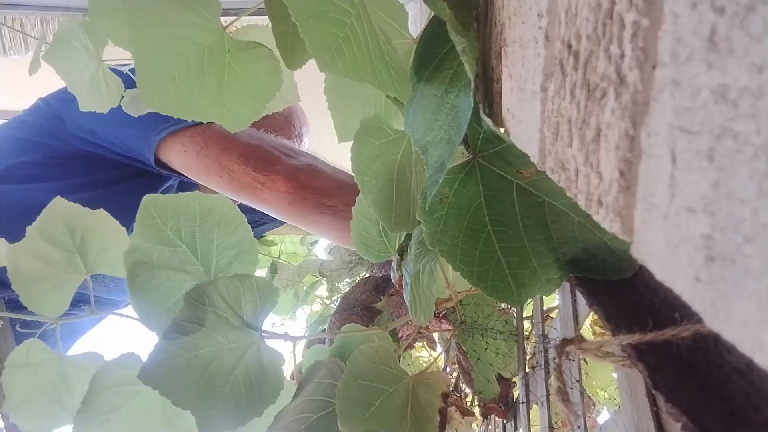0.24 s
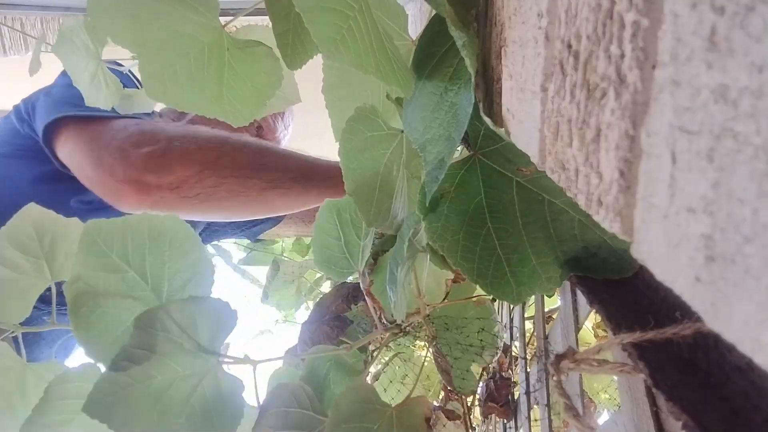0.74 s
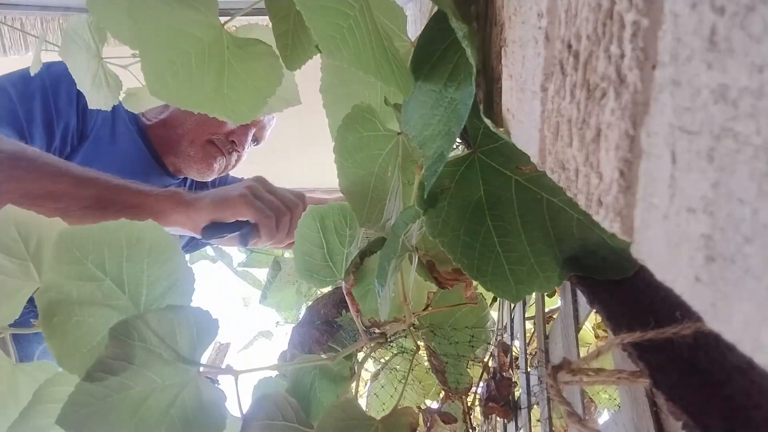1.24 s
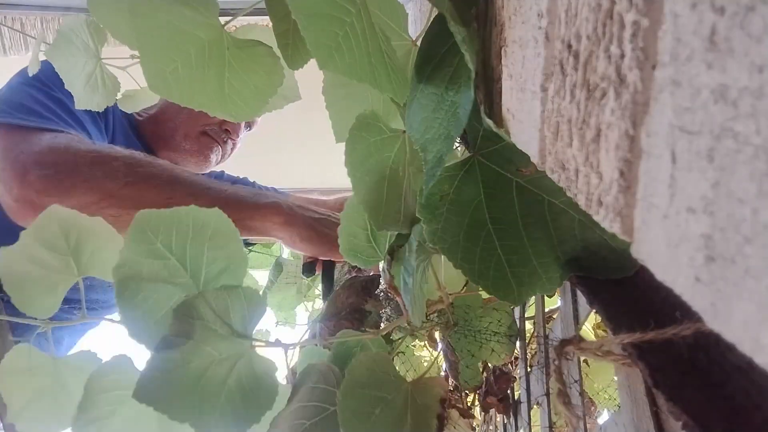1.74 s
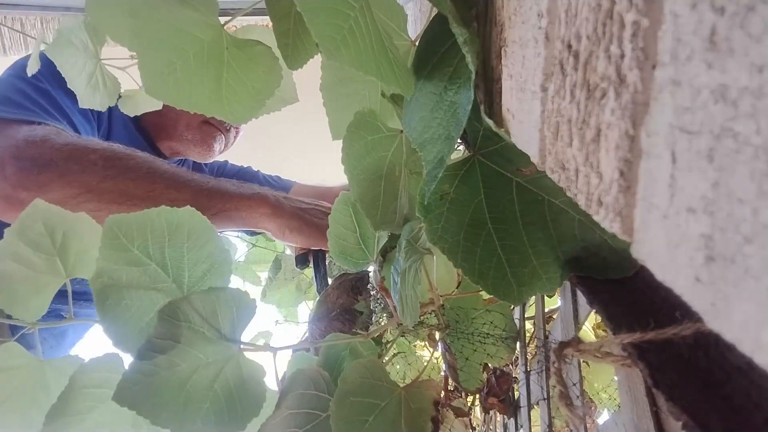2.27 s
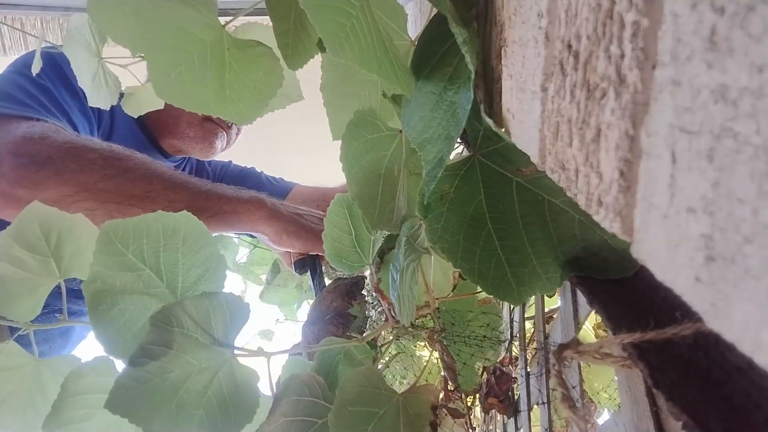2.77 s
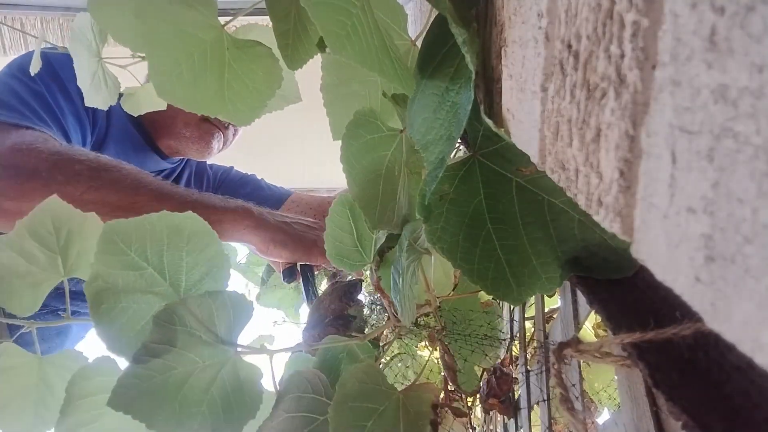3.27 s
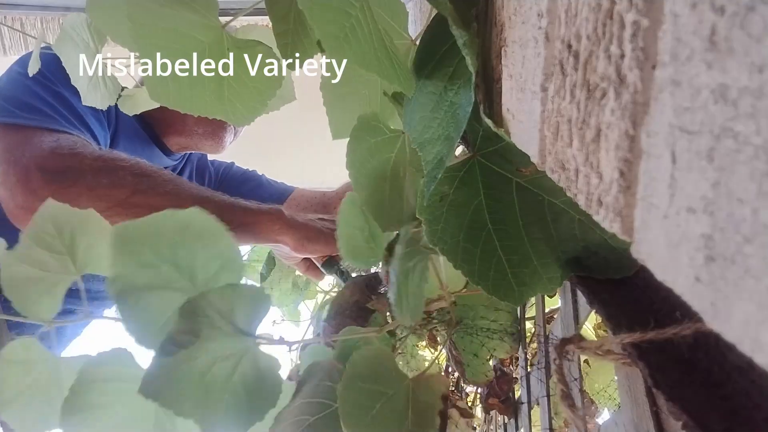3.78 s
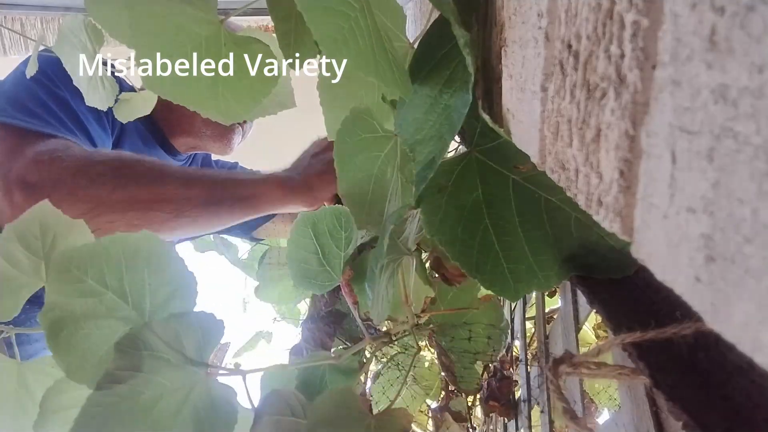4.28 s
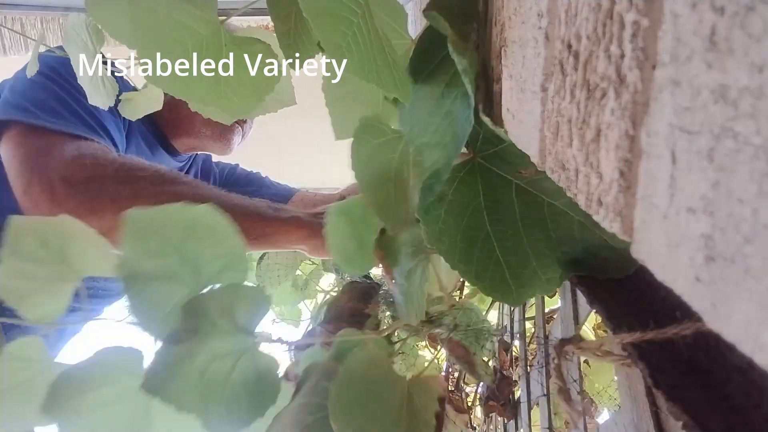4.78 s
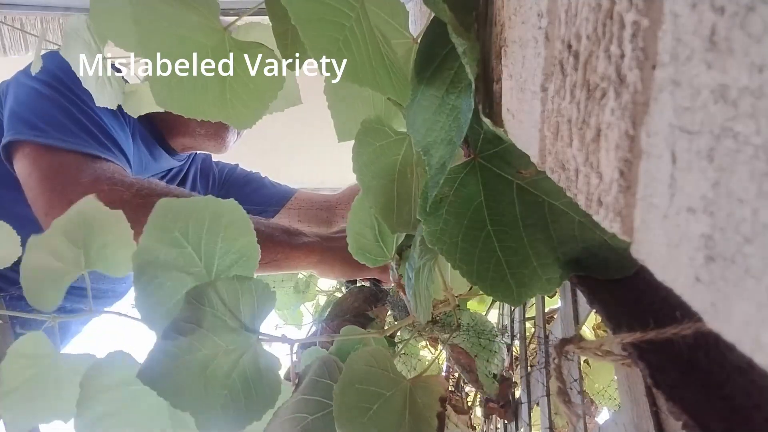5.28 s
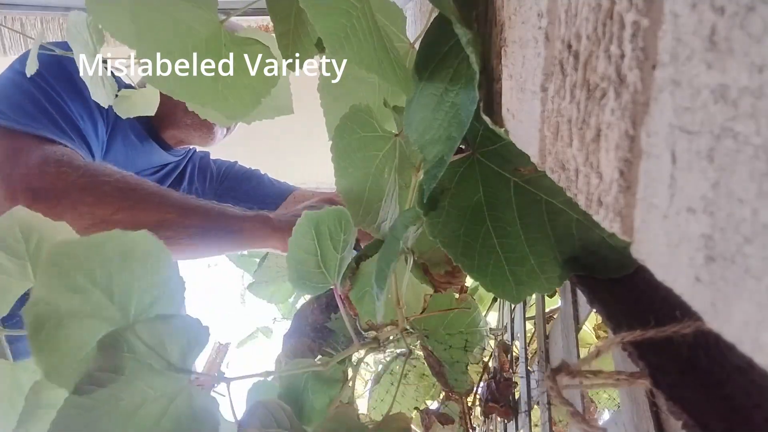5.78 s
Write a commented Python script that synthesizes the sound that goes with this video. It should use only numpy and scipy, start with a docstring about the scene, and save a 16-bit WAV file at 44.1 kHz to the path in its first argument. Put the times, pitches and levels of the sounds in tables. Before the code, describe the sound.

One close, crisp cut of hand shears outdoors, followed by light leaf rustling that builds with small cracks and ticks.

```python
"""Pruning shears snip once through a grape stalk, close by, under a vine trained along a house wall:
the fibres fracture in steps and two impacts excite the modes of the metal. Then hands work into the
foliage: leaves slide and buckle, shoots knock, and smaller stalks snap. The leaves and the wall
scatter these sounds briefly; a distant machine hums under the quiet outdoor air."""
import sys
import numpy as np
from scipy import signal
from scipy.fft import rfft, irfft, next_fast_len
from scipy.io import wavfile

SR = 44100
rng = np.random.default_rng(int(sys.argv[2]) if len(sys.argv) > 2 else 0)


def to_wav(s):
    """Save 16-bit WAV."""
    ch = np.atleast_2d(s).T  # columns
    pcm = np.round(np.clip(ch, -1, 1) * 32767)  # PCM
    wavfile.write(sys.argv[1], SR, pcm.astype(np.int16))


N = 265570
T = np.arange(N) / SR
SIZE = next_fast_len(N, True)
FREQS = np.fft.rfftfreq(SIZE, 1 / SR)
TOP_HZ = 14500


def amp(db):
    """Amplitude grows tenfold for every 20 dB."""
    return 10 ** (np.asarray(db) / 20)


def unit(x):
    """Normalisation to an rms of 1."""
    return x / np.sqrt(np.mean(x ** 2))


def shape(points):
    """Interpolation of (Hz, value) rows over log frequency, at every spectral bin."""
    hz, value = np.transpose(points)
    return np.interp(np.log(FREQS + 1), np.log(hz), value)


def filtered(x, gain):
    """Linear filtering multiplies each spectral bin by a gain."""
    return irfft(rfft(x, SIZE) * gain, SIZE)[..., :N]


def colour(x, points):
    """Minimum-phase filtering: folding the cepstrum makes a (Hz, dB) spectrum causal, at unit power."""
    cepstrum = irfft(np.log(unit(amp(shape(points)))), SIZE)
    cepstrum[1:SIZE // 2] *= 2
    cepstrum[SIZE // 2 + 1:] = 0
    return filtered(x, np.exp(rfft(cepstrum)))


def walk(rate):
    """Slow random modulation of rms 1, joining `rate` Gaussian values a second."""
    knots = rng.standard_normal(int(N / SR * rate) + 2)
    return unit(np.interp(T * rate, np.arange(len(knots)), knots))


def burst(start, rise, t60):
    """Exponential decay, 60 dB in t60 seconds, after a quick build-up."""
    first = max(int(start * SR), 0)
    t = T[:min(int(2 * t60 * SR) + 2, N - first)]
    envelope = np.zeros(N)
    envelope[first:first + len(t)] = amp(-60 * t / t60) * (1 - amp(-60 * t / rise))
    return envelope


def grains(rate, scatter_db):
    """Shot noise: about `rate` tiny clicks a second, of uneven size, shared by two noise carriers."""
    size = (rng.random(N) < rate / SR) * amp(scatter_db * np.clip(rng.standard_normal(N), -2, 2))
    smear = np.exp(-np.arange(24) / 8)
    power = signal.lfilter(smear, 1, size ** 2)
    return unit(np.sqrt(power) * rng.standard_normal((2, N)))


def placed(pan_db):
    """A level difference sets direction; pan is the left level minus the right."""
    return amp(np.array([[.5], [-.5]]) * pan_db)


def spread(pair):
    """Partial coherence: long waves reach both sides alike, short waves unrelated."""
    # Likeness of the sides. Each row: frequency in Hz, coherence from 0 to 1.
    likeness = [(30, 0.6), (70, 1), (250, 0.88), (640, 0.93), (1400, 0.2), (15000, 0)]
    alike = shape(likeness)
    mid, side = filtered(pair, np.sqrt([(1 + alike) / 2, (1 - alike) / 2]))
    return np.array([mid + side, mid - side])


def outdoors(waver_db, drift_rad):
    """A line spectrum over broadband noise: a distant machine's hum wavers on its way through the air."""
    # Distant rumble falling to a thin hiss. Each row: frequency in Hz, relative level in dB.
    air_spectrum = [(25, -31), (50, -13), (75, -1), (115, 0), (150, -7), (210, -13), (380, -12), (700, -19),
                    (1000, -24), (1600, -29), (2400, -29), (3200, -35), (6000, -40), (14500, -37)]
    # The machine's tones. Each row: frequency in Hz, rms level in dB about which it wavers.
    hum_lines = [(119.5, -62.5), (228, -73), (279.4, -72.5), (361, -74), (480, -74.5), (559, -76.5),
                 (715, -81), (1005, -85), (1301, -84)]
    air = unit(filtered(spread(rng.standard_normal((2, N))), amp(shape(air_spectrum))))
    hum = 0
    for hz, db in hum_lines:
        amplitude = np.sqrt(2) * amp(db + waver_db * walk(7))
        hum += amplitude * np.sin(2 * np.pi * hz * T + drift_rad * walk(12))
    return amp(-54.8 + walk(4.15)) * air + hum


def leaf_motion():
    """Incoherent sources add in power: hand strokes sum to the gains of the leaves' body and treble."""
    # A hand brushes the leaves. Each row: fastest moment in seconds, level in dB, length in seconds,
    # extra treble in dB.
    strokes = [(0.00, -66.5, 0.16, 11), (0.42, -60, 0.13, 2.5), (0.8, -64, 0.21, 1), (0.945, -65, 0.1, 3),
               (1.27, -68, 0.5, 6), (1.796, -53.5, .22, 4), (1.95, -61, 0.2, 3), (2.06, -65, .2, 7),
               (2.813, -54.5, 0.041, -8), (2.833, -63, 0.23, 6), (3.072, -72, 0.14, 14.5),
               (3.265, -70, 0.28, 10.5), (3.504, -62, 0.27, 10), (3.656, -55, 0.22, 8),
               (3.84, -59, 0.1, 13.5), (3.895, -55.5, 0.37, 1.5), (4.163, -52, 0.49, 8.5),
               (4.322, -54, 0.074, 3), (4.442, -50, 0.18, 8.5), (4.778, -55, 0.047, 4.5),
               (4.892, -48, 0.22, 6), (4.97, -49.5, 0.3, 3.5), (5.26, -61, 0.46, 5),
               (5.485, -46, 0.19, 2.5), (5.727, -56, 1, 3), (5.96, -77, 0.25, 5)]
    range_db, swell_share = 12.5, 0.4  # the hand speeds up faster than it slows
    body = treble = amp(-81) ** 2  # leaves barely stirring
    for peak, db, length, treble_db in strokes:
        from_peak = np.maximum((peak - T) / swell_share, (T - peak) / (1 - swell_share)) / length
        power = amp(db - range_db * np.minimum(from_peak, 10)) ** 2
        body = body + power
        treble = treble + power * amp(treble_db) ** 2
    return np.sqrt(body), np.sqrt(treble)


def crinkles(rate, t60, scatter_db):
    """Buckling: single leaves give way at random moments, each in a very short crackle."""
    buckles = (rng.random(N) < rate / SR) * amp(-scatter_db * rng.random(N))
    envelope = signal.oaconvolve(buckles, burst(0, .004, t60)[:SR // 16])[:N]
    return unit(envelope * rng.standard_normal((2, N)))


def flicker(pair, depth_db, rate):
    """Independent amplitude modulation of overlapping bands, as new patches of leaf take over."""
    centres = np.linspace(0, 1, 7) ** 2 * TOP_HZ
    bands = (np.interp(FREQS, centres, row) for row in np.eye(len(centres)))
    return sum(filtered(pair, band) * amp(depth_db * walk(rate)) for band in bands)


def rustle():
    """Friction noise: leaves slide in fine grains, dry edges crinkle, and bent shoots brush more dully."""
    # Spectra of sliding leaves and of brushing shoots. Each row: frequency in Hz, relative level in dB.
    leaf_spectrum = [(300, 1), (1000, 7.5), (2200, 7.5), (4000, -2), (6500, -8), (9000, -4.5), (11300, -2),
                     (13300, -2), (14500, -21)]
    shoot_spectrum = [(60, -15), (140, 5), (230, -5), (350, 6.5), (520, -0.5), (900, 1), (1900, -7.5),
                      (3000, -8.5), (6000, -16), (14000, -59.5)]
    # The arm leans in and bends whole shoots. Each row: time in seconds, relative level in dB.
    lean = [(3.25, -83), (3.38, -65.5), (4.3, -58), (5.1, -63), (5.6, -60.5), (6.02, -55.5)]
    dry_hz, typical_stroke_db, shoot_follow = 4800, -58, 0.12
    body, treble = leaf_motion()
    friction = amp(walk(60)) * grains(rate=9900, scatter_db=-3.0)
    crackle = amp(-2.5) * crinkles(rate=90, t60=.018, scatter_db=14)
    dryness = FREQS ** 4 / (FREQS ** 4 + dry_hz ** 4)
    sliding = body * filtered(friction, 1 - dryness) + treble * filtered(friction + crackle, dryness)
    lean_s, lean_db = np.transpose(lean)
    bending = amp(np.interp(T, lean_s, lean_db)) * (body / amp(typical_stroke_db)) ** shoot_follow
    pushing = bending * amp(1.2 * walk(45)) * grains(rate=2500, scatter_db=0.0)
    brushing = amp(0.5) * colour(sliding, leaf_spectrum) + amp(0.4) * colour(pushing, shoot_spectrum)
    return flicker(spread(brushing), depth_db=1.7, rate=30)


def flicks():
    """Elastic release: a dry leaf edge or tendril springs free with a tiny crisp tick."""
    # Each row: start in seconds, level in dB, t60 in seconds, pan in dB.
    releases = [(0.195, -53, .05, -1), (0.465, -52, .06, 4), (0.530, -56.5, 0.045, 2),
                (0.753, -56, 0.12, 4), (0.920, -54, 0.13, 5), (1.293, -46, 0.026, -5),
                (1.399, -48, 0.037, -5), (1.450, -58, 0.035, -1), (1.475, -49, 0.031, 0),
                (1.698, -50.5, 0.033, 2), (1.866, -44.5, 0.046, -1), (2.148, -63, 0.045, 2),
                (2.447, -51.5, 0.041, 3), (2.538, -52, 0.042, -1), (3.073, -51.5, 0.068, 0),
                (3.103, -53, .05, -4), (3.4427, -45.5, .06, 0), (3.456, -43, 0.055, 1),
                (3.62, -50, 0.12, -3), (3.881, -38.5, 0.067, 4), (4.1215, -44, 0.066, -4),
                (4.683, -54, .05, -10), (4.833, -47, 0.13, 1), (5.072, -44, 0.057, -1),
                (5.143, -54, 0.042, 0), (5.4045, -47.5, .06, 1), (5.837, -47, 0.06, -4),
                (5.915, -56, 0.058, 0)]
    # Spectrum of a flick. Each row: frequency in Hz, relative level in dB.
    crisp_spectrum = [(500, -14), (2000, -9.5), (5000, -9), (8000, -6), (11500, 0.5), (14500, -0.5)]
    envelope = sum(amp(db) * placed(pan) * burst(s, .004, t60) for s, db, t60, pan in releases)
    return colour(envelope * spread(grains(rate=9800, scatter_db=10)), crisp_spectrum)


def snip():
    """Fracture and impact: fibres break in quick steps, and two blows excite the shears' damped modes."""
    # Modes of the shears. Each row: frequency in Hz, relative level in dB, t60 in seconds, pan in dB.
    modes = [(575, -19.5, 0.068, -8), (940, -20, 0.028, -17), (1040, -12.5, 0.073, -5),
             (1214, -5.5, 0.02, 8.5), (1345, -13, 0.044, 14), (1585, -13.5, 0.042, -8),
             (1667, -22, 0.055, 20), (2005, -21.5, 0.093, -12), (2250, -18, 0.045, -8),
             (2490, -21, 0.05, 14), (2690, -14, 0.051, 4), (3250, -20.5, 0.015, -27), (3440, -27, 0.035, 5),
             (3760, -37, 0.013, -3), (4100, -22, 0.023, -21), (10400, -14, 0.026, -10),
             (11640, -16, 0.043, -2), (13300, -27, 0.042, -4)]
    # The blade jumps through, then the jaws meet. Each row: time in seconds, level in dB.
    impacts = [(0.2840, -13.7), (0.28645, -17.3)]
    # Bite, crunch, break, tearing free. Each row: start in seconds, level in dB, rise and t60 in seconds.
    steps = [(0.2660, -36.5, 0.038, 0.15), (0.2786, -26.5, 0.0083, 0.1), (0.283, -18, 0.0022, 0.05),
             (0.306, -45, 0.0088, 0.061)]
    # Spectrum of breaking fibres. Each row: frequency in Hz, relative level in dB.
    fibre_spectrum = [(30, -62), (200, 1.5), (420, -4.5), (700, 1.5), (1200, 6.5), (2500, 3), (4200, 0),
                      (6500, -8.5), (9000, -2.5), (11500, 0.5), (14500, -3)]
    # Shading of a close cut off to one side. Each row: frequency in Hz, pan in dB.
    shading = [(600, 1.5), (1200, -8), (2500, 0), (4500, -4), (7000, -7), (9500, -1), (14500, -1)]
    t, ring = T[:SR // 4], 0
    for hz, db, t60, pan in modes:
        mode = amp(db) * placed(pan) * np.sin(2 * np.pi * hz * t) * amp(-60 * t / t60)
        ring = mode - ring  # neighbouring modes swing in opposite senses
    blows = sum(amp(db) * signal.unit_impulse(N, int(s * SR)) for s, db in impacts)
    metal = signal.fftconvolve(blows[None], ring, axes=1)[:, :N]
    breaking = sum(amp(db) * burst(s, rise, t60) for s, db, rise, t60 in steps)
    crack = colour(spread(breaking * grains(rate=10000, scatter_db=-1.5)), fibre_spectrum)
    return metal + filtered(crack, placed(shape(shading)))


def thuds():
    """Damped free vibration: the vine sounds a low tone as it is let go or tugged."""
    # Each row: start in seconds, level in dB, frequency in Hz, t60 in seconds.
    jolts = [(0.284, -40.5, 98, 0.37), (0.310, -38.5, 356, 0.065), (2.770, -39, 69, 0.13),
             (4.222, -33, 215, 0.029), (5.452, -53, 360, 0.047)]
    return sum(amp(db) * burst(s, 0.014, t60) * np.sin(2 * np.pi * hz * (T - s))
               for s, db, hz, t60 in jolts)


def taps():
    """Resonance: the shears' handles and spring tick, and each click drives a short, hollow ring."""
    # Each row: start in seconds, level in dB, resonance in Hz, t60 in seconds, pan in dB.
    contacts = [(2.330, -62, 2240, .055, 2), (2.538, -64, 1810, .055, 5), (3.034, -59, 1900, .07, 0),
                (3.373, -60, 1700, .06, 0)]
    bandwidth_hz, bare_click_db = 420, -10
    tapping = 0
    for s, db, hz, t60, pan in contacts:
        click = burst(s, .004, t60) * rng.standard_normal((2, N))
        detuning = FREQS / hz - hz / (FREQS + 1)
        hollow = unit(1 / (1 + 1j * detuning * hz / bandwidth_hz))
        tapping += amp(db) * placed(pan) * filtered(click, hollow + amp(bare_click_db))
    return tapping


def stalk(start, hz):
    """The inharmonic bending modes of one stalk ring as it snaps."""
    # Each row: frequency as a multiple of the stalk's pitch, relative level in dB.
    modes = [(0.92, 0.5), (1.138, -2.5), (1.7, -12), (2.35, -12)]
    first = int(start * SR)
    t = T[:min(SR // 8, N - first)]
    ring = sum(amp(db) * np.sin(2 * np.pi * (ratio * hz * t + rng.random((2, 1)))) for ratio, db in modes)
    return np.pad(ring, ((0, 0), (first, N - first - len(t)))) * burst(start, rise=0.012, t60=0.04)


def snaps():
    """Brittle fracture: each small break gives a spray of crackle, a woody knock and a ringing stalk."""
    # Stalks snap and shoots knock. Each row: start in seconds, relative levels of crack and knock in dB,
    # pitch in Hz, pan in dB.
    breaks = [(3.028, -50.5, -63, 1900, 0), (3.375, -66, -59, 1334, 0), (3.398, -50, -53.5, 874, -3),
              (3.416, -64, -54.5, 1010, -1), (3.641, -47, -50.5, 880, -4), (3.772, -40.5, -55, 1920, -2.5),
              (3.818, -45, -57, 2130, -4), (3.894, -40, -51.5, 1414, -5), (3.922, -52, -53.5, 1190, -5),
              (4.2077, -38, -42.5, 1070, -4.5), (4.22, -47, -55, 1290, -1), (4.404, -36.5, -54, 1210, -2),
              (4.872, -41, -48, 1980, 1), (4.924, -46, -56, 1500, -13), (4.999, -36, -64, 2120, -1),
              (5.02, -45.5, -66, 1500, -2), (5.201, -44, -57, 2680, 0), (5.22, -40.5, -43.5, 1154, -4.5),
              (5.443, -35.5, -43.5, 737, -5.5), (5.4501, -39, -40, 2240, -5), (5.561, -52, -45, 730, -3),
              (5.712, -42.5, -47.5, 1200, -2), (5.754, -41.5, -50, 1507, 0), (5.951, -41, -46, 1390, -2)]
    # Spectra of the crack and the knock. Each row: frequency in Hz, relative level in dB.
    crack_spectrum = [(300, -21), (1000, -3.5), (2200, 0), (4000, 0.5), (6500, -4), (9000, 2), (11500, 4.5),
                      (14500, 0.5)]
    knock_spectrum = [(100, -20), (350, 11.5), (520, 8.5), (700, 13), (1100, 9), (2300, 7.5), (3300, -7),
                      (6000, -17), (14000, -18)]
    crack = knock = ring = 0
    for s, crack_db, knock_db, hz, pan in breaks:
        crack += amp(crack_db) * placed(pan) * burst(s, rise=0.01, t60=0.1)
        knock += amp(knock_db) * placed(pan) * burst(s, rise=0.01, t60=0.067)
        ring += amp(knock_db) * placed(pan) * stalk(s, hz)
    bright = colour(crack * spread(grains(rate=4400, scatter_db=-2.0)), crack_spectrum)
    woody = colour(knock * spread(grains(rate=5400, scatter_db=-3.5)), knock_spectrum)
    return amp(-2.0) * bright + amp(3.5) * woody + amp(7.5) * ring


def echoes(x, leaves_db, leaves_t60, wall_db, wall_t60):
    """Diffuse reflection: a quick scatter off the leaves and a later, longer one along the wall."""
    leaves = amp(leaves_db) * unit(burst(0.0005, 0.005, leaves_t60))
    wall = amp(wall_db) * unit(burst(0.018, 0.01, wall_t60))
    response = spread(rng.standard_normal((2, N)) * (leaves + wall)) / np.sqrt(N)
    return signal.oaconvolve(x, response[:, :SR // 4], axes=1)[:, :N]


def shifting_echoes(x, count, rate):
    """Time-varying scattering: as leaves move, several sets of paths crossfade at constant power."""
    weights = np.array([np.exp(walk(rate)) for _ in range(count)])
    weights /= np.sqrt(np.sum(weights ** 2, axis=0))
    return sum(weight * echoes(x, leaves_db=-4.5, leaves_t60=0.028, wall_db=-25.5, wall_t60=0.15)
               for weight in weights)


def scene():
    """Superposition of shears and foliage with their echoes, the vine's thuds and the outdoor air."""
    foliage = snaps() + flicks() + taps() + rustle()
    foliage += shifting_echoes(foliage, count=4, rate=9)
    cut = snip()
    cut += echoes(cut, leaves_db=-10.5, leaves_t60=0.011, wall_db=-20.5, wall_t60=0.14)
    return cut + foliage + thuds() + outdoors(waver_db=2, drift_rad=1.5)


def record(dry):
    """Frequency response: each microphone port colours its side, and a steep low-pass cuts the top."""
    # Each row: frequency in Hz, left minus right level in dB.
    ports = [(60, 0.5), (110, -1.5), (200, 3.5), (380, -2.5), (690, 7.5), (1280, 4.5), (2360, -1.5),
             (4360, -3), (8040, -5), (14800, 9.5)]
    heard = filtered(dry, placed(shape(ports)))
    return signal.sosfilt(signal.ellip(12, .2, 80, TOP_HZ, fs=SR, output="sos"), heard)


dry = scene()
out = record(dry)
to_wav(out)
```